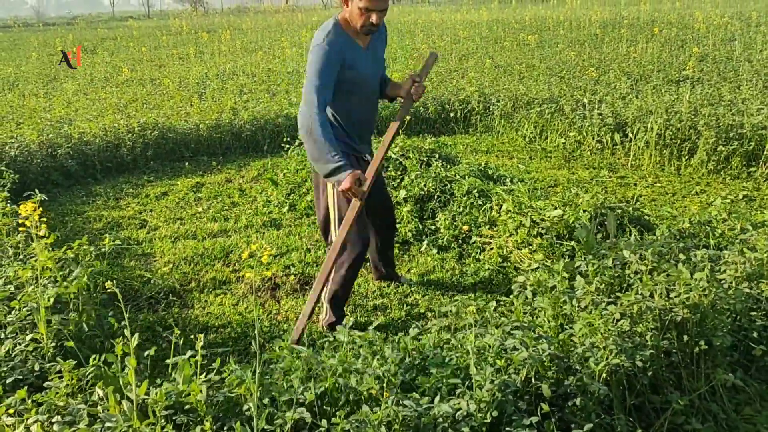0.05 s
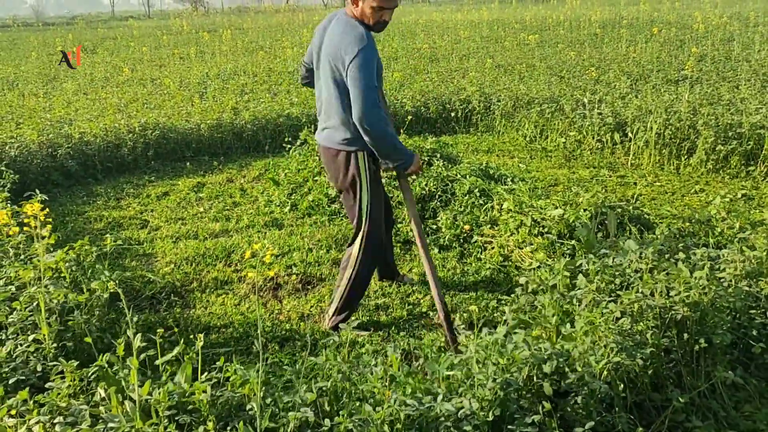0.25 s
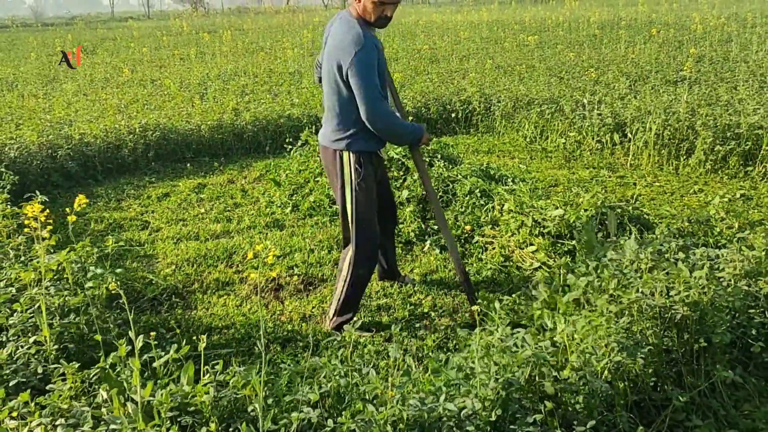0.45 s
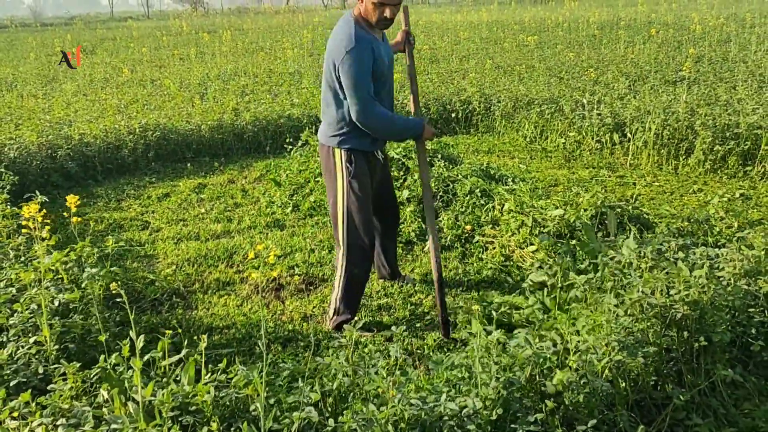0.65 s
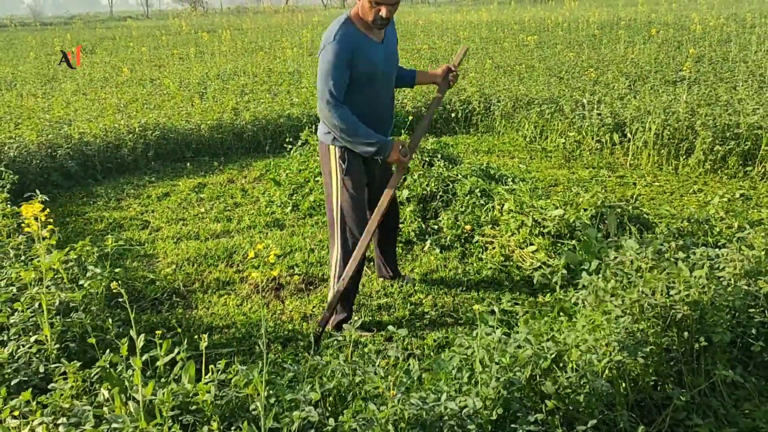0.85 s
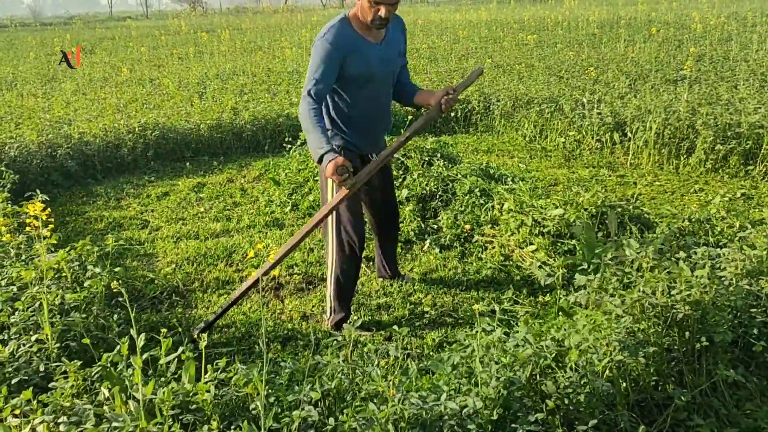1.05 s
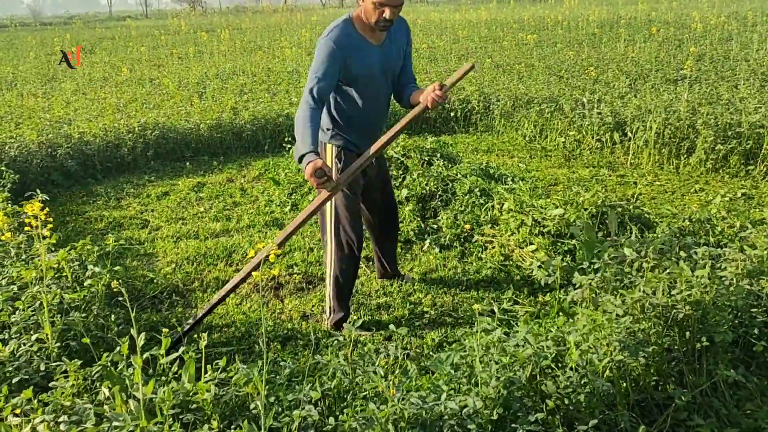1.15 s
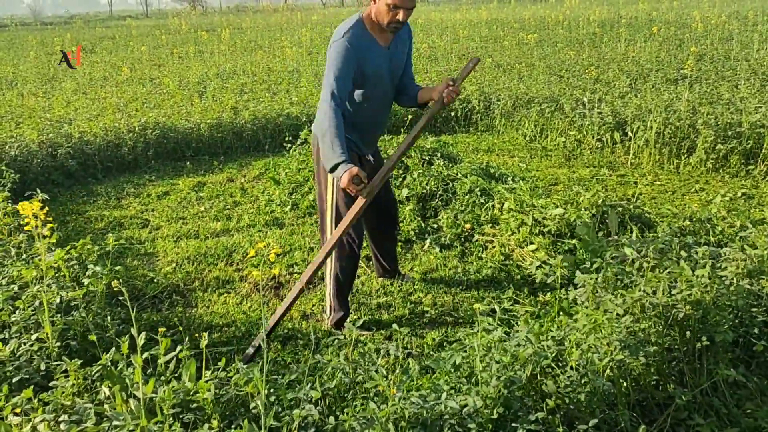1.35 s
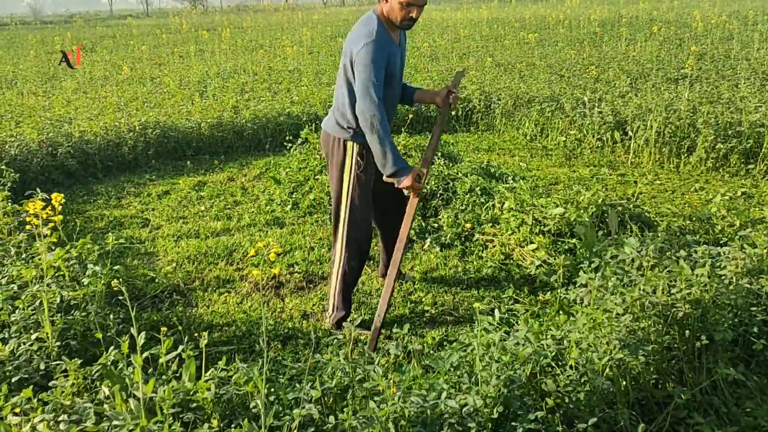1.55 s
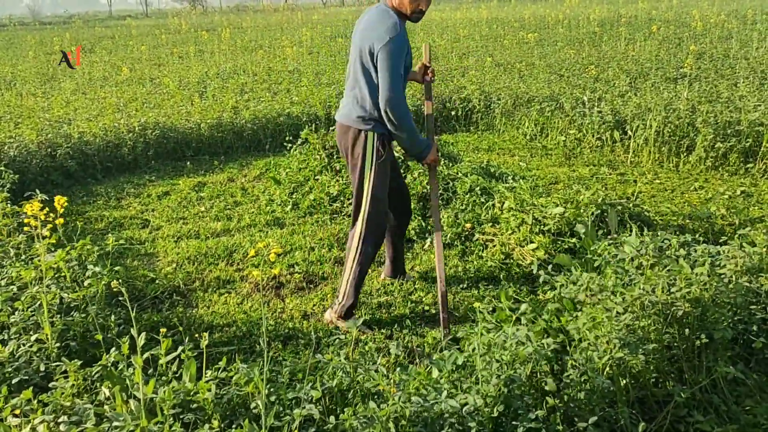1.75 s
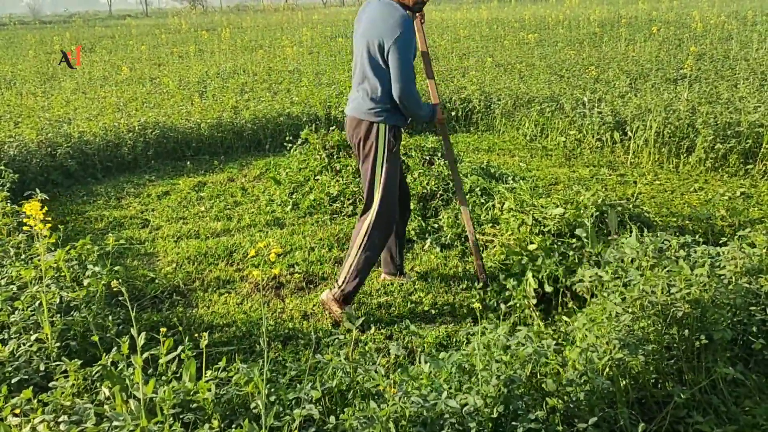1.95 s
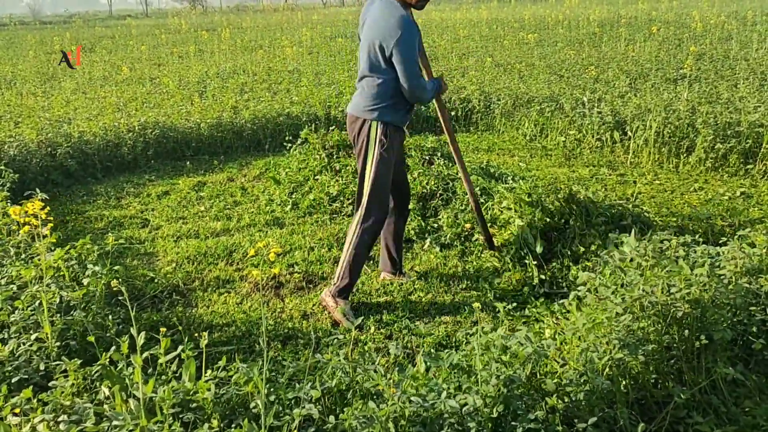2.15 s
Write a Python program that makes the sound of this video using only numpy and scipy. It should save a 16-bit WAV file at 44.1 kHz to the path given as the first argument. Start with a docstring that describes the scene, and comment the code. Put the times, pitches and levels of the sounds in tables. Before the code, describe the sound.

A scythe cuts through leafy plants twice, one strong crunching swish and then a gentler one.

```python
"""A scythe mows leafy green plants in an open field, over a low outdoor rumble and a distant hum.
First a strong cut: a dense crackle of parting stalks inside the rustle of leaves, with dull crunches
and a few thick stems that snap singly with a brief ring. Near one second the blade drags lightly back
over the stubble and slides off with a falling zip. From 1.4 s a gentler cut follows.
A very short echo off the ground close by colours every stroke."""
import sys
import numpy as np
from scipy.fft import rfft, irfft, next_fast_len
from scipy.io import wavfile
from scipy.ndimage import map_coordinates

SR = 44100
rng = np.random.default_rng(int(sys.argv[2]) if len(sys.argv) > 2 else 0)


def generate_wav(signal):
    """Clip the signal to [-1, 1] and save it as 16-bit WAV at the path in sys.argv[1]."""
    frames = np.transpose(np.atleast_2d(signal))
    scaled = np.clip(frames, -1, 1) * 32767
    pcm = np.round(scaled).astype(np.int16)
    wavfile.write(sys.argv[1], SR, pcm)


N = 97020
T = np.arange(N) / SR
SIZE = next_fast_len(N + 8192, True)
HZ = np.fft.rfftfreq(SIZE, 1 / SR)
TOP_HZ = 14950


def cuts():
    """Leaves rustle and stalks part in bunches as the edge passes through them."""
    # envelopes of the two cuts (time [s], leaf level [dB], stalk level [dB])
    strong_cut = [(0.0, -67, -70.5), (0.16, -44.5, -54), (0.184, -37.5, -41.5), (0.222, -33, -40.5),
                  (0.262, -26, -34.5), (0.28, -25, -30.5), (0.325, -25, -36), (0.385, -24, -38.5),
                  (0.506, -35.5, -40.5), (0.534, -37, -49), (0.585, -42, -47), (0.68, -43.5, -57),
                  (0.76, -65, -85)]
    gentle_cut = [(1.41, -78, -85), (1.442, -60, -68), (1.49, -55.5, -58), (1.512, -51.5, -53.5),
                  (1.638, -40, -48), (1.696, -36.5, -44), (1.736, -39, -49.5), (1.91, -34.5, -49.5),
                  (1.944, -37, -43.5), (1.998, -40, -52), (2.146, -42, -48.5), (2.2, -39.5, -46.5)]
    # spectra of leaves and stalks (frequency [Hz], level [dB])
    leaf_tone = [(200, -14), (1000, -11.5), (2000, -5.5), (2800, -0.5), (4000, 2.5), (5300, -2.5),
                 (6400, -13.5), (7600, -36), (9500, -22.5), (14500, -28)]
    stalk_tone = [(100, -11.5), (280, -2), (520, -7), (950, -1.5), (1500, -3), (2200, -1.5), (4000, -3.5),
                  (7000, -12.5), (15000, -42.5)]
    leaf_gain, stalk_gain = stroke(strong_cut) + stroke(gentle_cut)
    bunches = amp(0.6 * wobble(120))
    tearing = unit(fibres() + amp(-1) * rng.standard_normal((2, N)))
    leaves = filtered(tearing * leaf_gain * bunches, colour(leaf_tone))
    parting = crackle(per_s=2200, spread_db=1, hiss_db=-9)
    stalks = filtered(parting * stalk_gain * bunches, colour(stalk_tone))
    return amp(-5.5) * leaves + amp(2.5) * stalks


def fibres(per_s=5000, ring_s=0.0008, spread_db=3):
    """Mid and side of tearing fibres: each one ticks briefly at a pitch of its own."""
    t = np.arange(int(5 * ring_s * SR)) / SR
    when, pitch, phase, pan = rng.random((int(per_s * N / SR), 4)).T[:, :, None]
    size = amp(spread_db * np.clip(rng.standard_normal(when.shape), -2, 2))
    ticks = size * np.sin(2 * np.pi * (pitch * TOP_HZ * t + phase)) * np.exp(-t / ring_s)
    samples = ((when * N).astype(int) + np.arange(len(t))).ravel()
    mid = np.bincount(samples, ticks.ravel(), N)[:N]
    side = np.bincount(samples, (ticks * np.sign(pan - 0.5)).ravel(), N)[:N]
    return unit(np.array([mid, side]))


def stems(splinter_db=-23, splinter_s=0.006):
    """A thick stem breaks with one sharp crack, then its last fibres splinter."""
    # stem breaks (time [s], level [dB])
    breaks = [(.2741, -7.5), (0.2782, -8), (0.2825, -30), (0.2933, -7), (0.3046, -5), (0.3311, -6),
              (.373, -15), (.483, -15), (.51, -26), (1.657, -18), (1.698, -19), (1.828, -19), (1.8425, -18),
              (1.897, -27)]
    # spectrum of a thick stem (frequency [Hz], level [dB])
    tone = [(150, -7), (600, -1), (2000, 9), (4000, 17), (5400, -1.5), (7500, -30), (15000, -9)]
    cracks = np.zeros((2, N))
    for s, db in breaks:
        cracks[:, round(s * SR)] = amp(db) * np.array([1, rng.uniform(-1.1, 1)])
    tails = sum(amp(db + splinter_db) * (T >= s) * np.exp(-np.abs(T - s) / splinter_s)
                for s, db in breaks)
    return filtered(cracks + tails * crackle(per_s=3100), colour(tone))


def bites(rise_s=0.0011, t60_s=0.062):
    """A dull crunch where the blade meets a thick clump."""
    # bites into a clump (time [s], level [dB])
    hits = [(0.2684, -25.5), (0.278, -28.5), (0.302, -28), (.387, -38), (0.445, -34)]
    # spectrum of a clump (frequency [Hz], level [dB])
    tone = [(60, -23), (140, 0), (280, 6.5), (500, -7), (950, 7), (1500, 0), (2400, -36)]
    gain = np.zeros(N)
    for s, db in hits:
        attack = np.exp(np.minimum(T - s, 0) / rise_s)
        gain += attack * amp(db - 60 * np.maximum(T - s, 0) / t60_s)
    return filtered(crackle(per_s=1800, spread_db=3.5, hiss_db=-3) * gain, colour(tone))


def twigs():
    """Thin stems give way with short, bright cracks."""
    # thin stems breaking (time [s], level [dB], length [s])
    breaks = [(.555, -41, 0.01), (.571, -40, 0.018), (.591, -41, 0.0092), (.678, -51, 0.004),
              (.788, -53.5, 0.0095), (1.346, -59.5, 0.002), (1.755, -48, 0.012), (2.055, -43.5, 0.0048)]
    # spectrum of a thin stem (frequency [Hz], level [dB])
    tone = [(300, 3), (2000, -31), (3300, 12.5), (5000, 14.5), (6500, 1), (8200, -14), (15000, -12)]
    return snaps(breaks, colour(tone), per_s=2200, release_s=0.005)


def ringing(rolloff_hz=5500):
    """Frequency response of the narrow ringing tones that colour the blows and knocks."""
    # ringing tones (frequency [Hz], level [dB], width [Hz])
    tones = [(1035, -4, 45), (1432, 8.5, 27), (1898, 8.5, 130), (2653, 9.5, 71), (3244, 10.5, 20),
             (3740, 3.5, 51), (4500, 5.5, 39)]
    ring = sum(amp(db) * 1j * HZ * width / (hz ** 2 - HZ ** 2 + 1j * HZ * width)
               for hz, db, width in tones)
    return ring / (1 + (HZ / rolloff_hz) ** 6)


def knocks(ring):
    """The blade is knocked and rings briefly with a hollow rasp."""
    # knocks that set the blade ringing (time [s], level [dB], length [s])
    contacts = [(.183, -43, 0.037), (.335, -40, 0.061), (1.117, -46.5, 0.022), (1.24, -65, 0.087),
                (1.694, -39, 0.007), (1.835, -48, 0.011), (1.921, -38, 0.01)]
    body = ring / np.sqrt(np.mean(np.abs(ring) ** 2))
    return snaps(contacts, body, per_s=2500, release_s=0.011)


def drag():
    """The back of the blade brushes the stubble with a fine hiss; its zip drops in pitch as it slows."""
    # envelope of the back stroke (time [s], level [dB])
    back_stroke = [(0.72, -63.5), (0.962, -52), (1.1, -56.5), (1.17, -58.5), (1.22, -66.5)]
    # spectrum of the stubble (frequency [Hz], level [dB])
    tone = [(200, -7.5), (1600, -6.5), (2700, -1), (3900, 2), (4900, -6), (6000, -9.5), (7600, -21.5),
            (9500, -25.5), (14500, -31)]
    # zip of the blade sliding off (time [s], level [dB], centre [Hz])
    slide = [(.95, -62, 3700), (1.16, -53, 3850), (1.21, -55, 3700), (1.232, -54, 3350), (1.246, -72, 3000)]
    bristle = crackle(per_s=4600, hiss_db=4)
    brush = filtered(bristle * stroke(back_stroke) * amp(0.4 * wobble(70.2)), colour(tone))
    s, db, hz = np.transpose(slide)
    zip_off = stroke(np.transpose([s, db])) * noise_band(np.interp(T, s, hz), half_width_hz=480)
    return amp(6.5) * brush + zip_off


def ground_echo(delay_s=0.0015306):
    """Frequency response of the bounce off the ground close by."""
    # colour of the bounce (frequency [Hz], level [dB])
    tone = [(900, -32), (2200, 2), (6000, -5.5)]
    return 0.32 * amp(along(tone)) * np.exp(-2j * np.pi * HZ * delay_s)


def air(hum_hz=153, drift_hz=2.4):
    """Distant rumble, a low hum that swells and the faint hiss of the open field."""
    # spectrum of the open air (frequency [Hz], level [dB])
    tone = [(18, -9), (45, 0), (75, -4.5), (130, -1), (185, 0.5), (235, -11), (350, -8.5), (620, -12),
            (1200, -21.5), (2300, -26), (3200, -30), (4400, -34), (5500, -32.5), (8000, -46), (15000, -50)]
    # envelope of the distant hum (time [s], level [dB])
    swell = [(0, -61.5), (.6, -61.5), (.82, -55.5), (1.15, -63), (1.35, -68)]
    # stereo width of the air (frequency [Hz], side minus mid [dB])
    width = [(60, -21), (160, -14), (350, -7), (1000, 3)]
    noise = rng.standard_normal((2, N)) * amp(0.38 * wobble(9.3))
    mid, side = amp(-51) * filtered(noise, colour(tone))
    pitch_hz = hum_hz + drift_hz * wobble(10.16)
    hum = stroke(swell)[0] * unit(np.sin(2 * np.pi * np.cumsum(pitch_hz) / SR))
    return mid + hum, filtered(side, amp(along(width)))


def crackle(per_s, spread_db=4, hiss_db=-4):
    """Mid and side of tiny fractures of random size and direction, over a smooth rubbing hiss."""
    fractures = rng.random(N) < per_s / SR
    sizes = amp(spread_db * np.clip(rng.standard_normal(N), -2, 2))
    clicks = unit(fractures * sizes * rng.choice([-1, 1], (2, N)))
    return unit(clicks + amp(hiss_db) * rng.standard_normal((2, N)))


def snaps(rows, body, per_s, release_s):
    """Short runs of tiny cracks, coloured by the given response."""
    gain = sum(amp(db) * (T >= s) * np.exp(-np.maximum(T - s - length, 0) / release_s)
               for s, db, length in rows)
    return filtered(crackle(per_s) * gain, body)


def noise_band(centre_hz, half_width_hz):
    """Mid and side of a narrow band of noise around a moving centre."""
    a, b = filtered(rng.standard_normal((2, 2, N)), 1 / (1 + (HZ / half_width_hz) ** 4))
    phase = 2 * np.pi * np.cumsum(centre_hz) / SR
    return unit(a * np.cos(phase) + b * np.sin(phase))


def stroke(rows, fade_s=0.031):
    """A gain envelope for each level column, fading away beyond the first and last times."""
    s, *levels = np.transpose(rows)
    outside_s = np.maximum(s[0] - T, 0) + np.maximum(T - s[-1], 0)
    return np.array([amp(np.interp(T, s, db)) * np.exp(-outside_s / fade_s) for db in levels])


def wobble(knots_per_s):
    """A smooth random curve."""
    return map_coordinates(rng.standard_normal(4096), [T * knots_per_s], mode="mirror")


def colour(points):
    """Minimum-phase response of unit power with the given spectrum."""
    cepstrum = irfft(np.log(unit(amp(along(points))) + 1e-6), SIZE)
    cepstrum[1:SIZE // 2] *= 2
    cepstrum[SIZE // 2 + 1:] = 0
    return np.exp(rfft(cepstrum))


def along(points):
    """An EQ curve through the points, on a log frequency axis."""
    hz, db = np.transpose(points)
    return np.interp(np.log(HZ + 1), np.log(hz + 1), db)


def filtered(x, response):
    """x through a frequency response."""
    return irfft(rfft(x, SIZE) * response, SIZE)[..., :N]


def amp(db):
    """Decibels to gain."""
    return 10 ** (np.asarray(db) / 20)


def unit(x):
    """Scale to rms 1."""
    return x / np.sqrt(np.mean(x ** 2) + 1e-20)


def scene():
    """The mowing with its ground echo, in the open air, spread over two channels."""
    # stereo width of the mowing (frequency [Hz], side minus mid [dB])
    width = [(300, -28), (800, -16), (1400, -4.5), (2500, -2), (4000, -3), (5000, -2.5), (7000, -0.5)]
    # stereo balance (frequency [Hz], left minus right [dB])
    balance = [(1300, 0), (2000, 2), (2700, -4.5), (3600, -4), (5000, 0.5), (6500, -1), (9500, 1)]
    ring = ringing()
    thin_cracks = twigs()
    knocking = knocks(ring)
    blows = filtered(bites() + stems() + thin_cracks, 1 + ring)  # each blow rings briefly
    mid, side = cuts() + drag() + knocking + blows
    echo = ground_echo()
    air_mid, air_side = air()
    mid = filtered(mid, 1 + echo) + air_mid
    side = filtered(side, amp(along(width)) * (1 + 0.5 * echo)) + air_side
    lean_db = along(balance) / 2
    return filtered(np.array([mid + side, mid - side]), amp([lean_db, -lean_db]))


def record(dry):
    """The microphone has a narrow dip in the treble, and nothing passes above the band limit."""
    dip_hz, width_hz, dip_db = 8190, 380, -8
    dip = amp(dip_db * np.exp(-((HZ - dip_hz) / width_hz) ** 2))
    return filtered(dry, dip * (HZ < TOP_HZ))


dry = scene()
out = record(dry)
generate_wav(out)
```